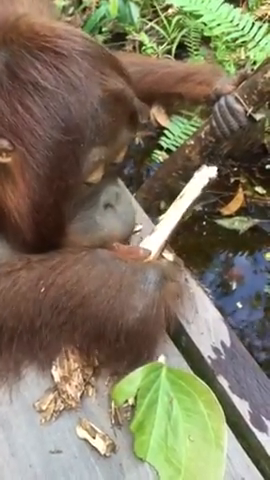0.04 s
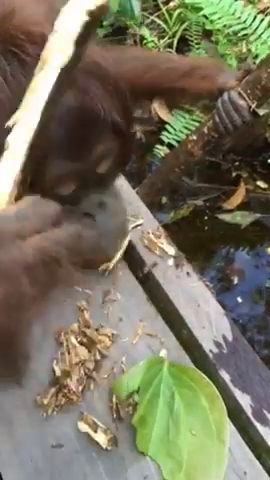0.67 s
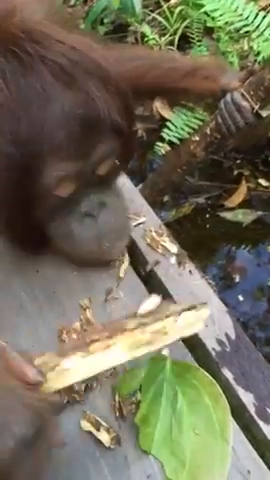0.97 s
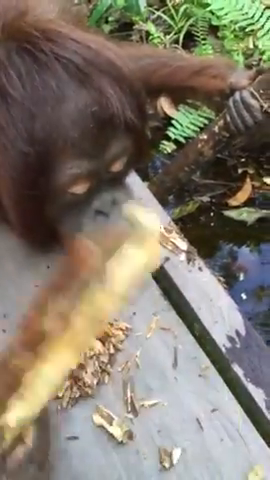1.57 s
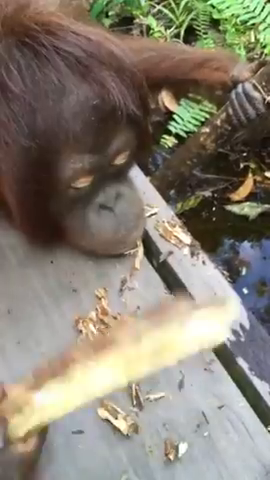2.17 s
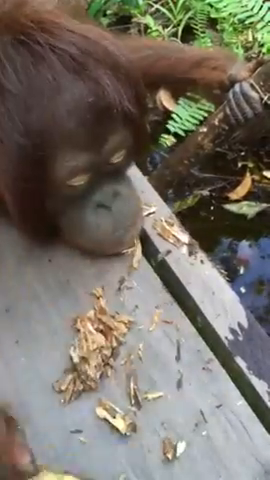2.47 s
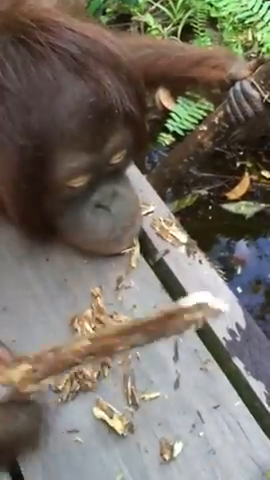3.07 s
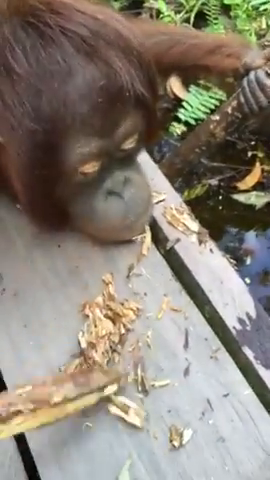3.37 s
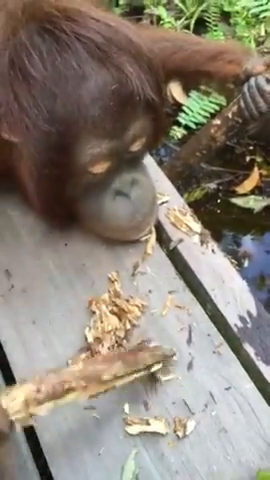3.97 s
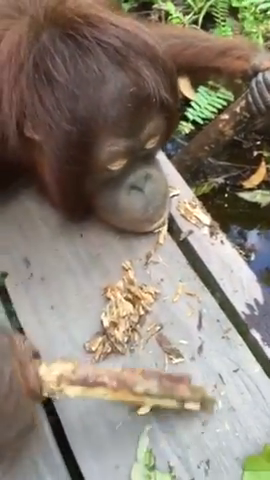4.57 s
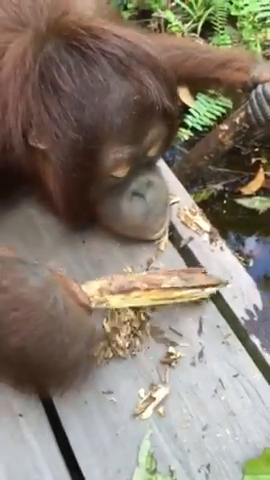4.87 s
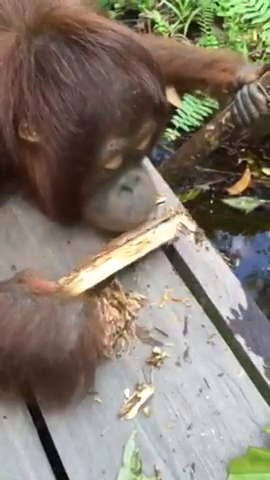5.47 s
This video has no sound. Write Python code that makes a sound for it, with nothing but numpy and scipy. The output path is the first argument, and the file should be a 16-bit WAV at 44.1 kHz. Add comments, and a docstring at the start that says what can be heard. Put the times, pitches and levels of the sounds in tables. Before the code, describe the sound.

Over a steady, high hiss of cicadas in a forest, a dry stick hits wooden planks close by, about twice a second. Some blows are hard and crunchy, others soft and dull, and the boards ring briefly. Small splinters click and skitter in between. The knocking gives way to faint scraping and a few ticks, while a lower insect drones faintly in the distance.

```python
"""Dry, crunchy knocks of wood on wood, close by, over a steady hiss of cicadas.
An orangutan beats a dry stick on a plank deck: the bark crunches, the plank thumps, deck and stick
ring, and splinters skitter away. Between blows and at the end the stick scrapes over the planks.
Behind it a lower-pitched insect drones and the forest rushes faintly."""
import sys
import numpy as np
from scipy import signal
from scipy.fft import rfft, irfft, next_fast_len
from scipy.io import wavfile
from scipy.ndimage import uniform_filter1d, map_coordinates

SR = 44100
rng = np.random.default_rng(int(sys.argv[2]) if len(sys.argv) > 2 else 0)


def dump_mix(stems):
    """Bounce the given channels to the path in sys.argv[1] as a 16-bit WAV at rate SR."""
    frames = np.atleast_2d(stems).T  # one column per channel
    limited = np.clip(frames, -1, 1)  # hard clip at full scale
    pcm = np.round(limited * 32767).astype(np.int16)
    wavfile.write(sys.argv[1], SR, pcm)


N = 252693
T = np.arange(int(.4 * SR)) / SR  # time axis of one event, s

# Stick hits deck: t/s, force/dB, contact cutoff/Hz, place from the plank's end/bending wavelengths,
# deck ring/dB, stick ring/Hz, bark crunch/dB
BLOWS = [(0.9999, -3, 863, 3.1, 1, 440, -29), (1.5107, -16, 301, 0.62, 1.5, 1020, -29),
         (2.0456, -4.5, 1086, 1.23, -1, 1530, -21.5), (2.0761, -11, 455, 1.38, 1.5, 702, -42),
         (2.56, -15.5, 222, 1.54, -0.5, 1010, -38.5), (3.0371, -15.5, 435, 1.76, 1.5, 569, -41),
         (3.4707, -0.5, 618, 2.15, 0, 514, -22.5), (3.9294, 0.5, 1290, 1.46, -4, 1800, -24),
         (3.974, -20.5, 346, 1.3, 5.5, 769, -51.5), (4.512, -5.5, 700, 1.99, -2.5, 1557, -32),
         (4.553, -11.5, 560, 1.72, 1, 637, -46), (4.925, -20.5, 420, 2.18, 6, 523, -59)]
# Spectrum of breaking bark: f/Hz, level/dB
BARK_SPECTRUM = [(300, -15.5), (1200, 2.5), (2000, -4), (2700, -5), (4200, -1), (5300, -4.5), (7000, -0.5),
                 (9500, -7), (12500, -2), (15500, -3.5)]


def amp(db):
    """Decibels to gain."""
    return 10 ** (np.asarray(db) / 20)


def unit(x):
    """Scale to rms 1."""
    return x / np.sqrt(np.mean(x ** 2) + 1e-20)


def along(points, hz):
    """Interpolate (f/Hz, value) points on a log axis."""
    f, v = np.transpose(points)
    return np.interp(np.log(hz + 1), np.log(f), v)


def filtered(x, response):
    """Apply a frequency response."""
    m = next_fast_len(len(x) + 8192)
    return irfft(rfft(x, m) * response(np.fft.rfftfreq(m, 1 / SR)), m)[:len(x)]


def noise(spectrum, size):
    """Noise of rms 1 with a (f/Hz, level/dB) spectrum."""
    return unit(filtered(rng.standard_normal(size), lambda hz: amp(along(spectrum, hz))))


def band(centre_hz, width_hz, size):
    """Resonant noise band of rms 1."""
    white = rng.standard_normal(size)
    return unit(filtered(white, lambda f: 1 / (1 + (2 * (f - centre_hz) / width_hz) ** 2)))


def butter(x, hz, kind, order):
    """Causal low-pass or high-pass."""
    return signal.sosfilt(signal.butter(order, hz, kind, fs=SR, output="sos"), x)


def fading(x, t60s):
    """Decay each frequency by a (f/Hz, t60/s) table."""
    hz, t, z = signal.stft(x, SR, nperseg=256)
    return signal.istft(z * amp(-60 * t / along(t60s, hz)[:, None]), SR, nperseg=256)[1][:len(x)]


def decay(t60_s):
    """Envelope falling 60 dB in t60_s."""
    return np.exp(-np.log(1000) * T / t60_s)


def swell(sigma_s):
    """Gaussian envelope centred in T."""
    return np.exp(-.5 * ((T - T[-1] / 2) / sigma_s) ** 2)


def wobble(rate_hz):
    """Smooth random curve over the whole scene."""
    knots = rng.standard_normal(int(N * rate_hz / SR) + 4)
    return map_coordinates(knots, [np.arange(N) * rate_hz / SR])


def roughness(samples):
    """Moving average of noise over one event, rms 1."""
    return unit(uniform_filter1d(rng.standard_normal(len(T)), size=samples))


def add(track, at_s, x):
    """Mix x in at at_s."""
    start = max(round(at_s * SR), 0)
    part = track[start:start + len(x)]
    part += x[:len(part)]


def blows(push_db=26.5, flex_hz=900, damping=0.41, modes_db=1, boards_db=-20, node_db=4):
    """Each blow shoves the plank and rings deck and stick; a soft contact leaves out the high modes."""
    # Deck modes: f/Hz, level/dB, t60/s
    deck_modes = [(83.05, -31, 0.22), (112, -40, .28), (161, -37, 0.097), (186.6, -26.5, 0.15),
                  (240.2, -34.5, 0.041), (304.8, -21.5, 0.18), (376, -30.5, 0.038), (435, -32.5, .1),
                  (492, -31, 0.093), (512, -24.5, 0.13), (628, -29, 0.098), (696, -22.5, 0.081),
                  (734, -22, 0.054), (836, -25.5, 0.06), (860, -31, 0.032), (954.5, -26, 0.053),
                  (1085, -31.5, 0.048), (1590, -30, 0.069), (1800, -21.5, 0.044)]
    # Dense ring of the other boards: f/Hz, level/dB
    board_spectrum = [(40, -19.5), (85, -4), (220, 6), (550, 2), (1000, -2.5), (1350, -7), (1900, -4.5),
                      (2400, -11), (5000, -17)]
    # Its decay: f/Hz, t60/s
    board_t60s = [(80, .16), (250, .13), (900, .1), (2000, .085), (6000, .06)]
    free_end_hz = 68  # rebound at the plank's free end
    joist_place, place_hz = 3.45, 307  # places count wavelengths at place_hz
    # only slow bending moves the whole plank
    shove = amp(push_db) * butter(signal.unit_impulse(len(T)), flex_hz, "low", order=1)
    spread = 1 - np.exp(-(T / 0.0013) ** 2)  # the bending wave fills the deck
    notch = signal.iirnotch(1320, Q=2.1, fs=SR)  # the stick passes little force between two modes
    out = np.zeros(N)
    for at_s, force_db, contact_hz, place, ring_db, stick_hz, _ in BLOWS:
        rebound_hz = free_end_hz / np.sqrt(max(1 - place / joist_place, .05))  # stiffer near the joist
        push = filtered(shove, lambda f: f*f / (f*f - rebound_hz ** 2 - 2j * damping * rebound_hz * f))
        modes = np.zeros(len(T))
        for hz, level_db, t60_s in deck_modes:
            shape_db = node_db * np.cos(2 * np.pi * place * np.sqrt(hz / place_hz))  # weak near a node
            gain = amp(level_db + shape_db + .5 * rng.normal())
            modes += gain * np.cos(2 * np.pi * hz * T) * decay(t60_s)
        boards = fading(noise(board_spectrum, len(T)), board_t60s)
        ring = amp(ring_db) * spread * (amp(modes_db) * modes + amp(boards_db) * boards)
        ring = butter(ring, 65, "high", order=3)  # the ring holds little below about 65 Hz
        deck = butter(signal.lfilter(*notch, push) + ring, contact_hz, "low", order=3)
        stick = np.sin(2 * np.pi * stick_hz * T) * decay(0.022) * (1 - np.exp(-T / 0.00095))
        stick *= amp(-12.5 + 0.93 * force_db)  # more prominent in hard blows
        add(out, at_s, amp(force_db) * (deck + stick))
    return out


def bark(sigma_s, cutoff_hz, grain_db=3, clump_db=3):
    """Bark fibres break in clumps of tiny unequal clicks, under one swell."""
    clumps = roughness(samples=60)
    clicks = rng.standard_normal(len(T))
    clicks *= amp(grain_db * rng.standard_normal(len(T)) + clump_db * clumps)
    grains = filtered(clicks, lambda f: amp(along(BARK_SPECTRUM, f)) / np.sqrt(1 + (f / cutoff_hz) ** 4))
    envelope = swell(sigma_s)
    return unit(grains * envelope) * np.sqrt(np.mean(envelope ** 2))


def crunches(lead_s=0.00092):
    """Bark is crushed just ahead of each thump; a softer contact takes longer."""
    out = np.zeros(N)
    for at_s, _, contact_hz, *_, crunch_db in BLOWS:
        crunch = bark(sigma_s=0.7 / contact_hz, cutoff_hz=11700)
        add(out, at_s - lead_s - T[-1] / 2, amp(crunch_db) * crunch)
    return out


def slides(slip_db=5.5, relative_width=0.63):
    """Stick-slip drives one wood resonance while the bark hisses over the plank."""
    # Slides of the stick: centre t/s, sigma/s, resonance/Hz, wood/dB, bark hiss/dB
    strokes = [(1.507, 0.0045, 1960, -33.5, -35.5), (1.522, 0.015, 1880, -73, -47),
               (1.571, 0.013, 1250, -62, -51), (1.634, 0.016, 1100, -52.5, -49.5),
               (2.09, 0.015, 1200, -67, -54), (3.045, 0.026, 1290, -75, -59.5),
               (3.369, 0.013, 1467, -70.5, -60), (3.431, 0.0058, 1360, -35, -54),
               (3.441, 0.0041, 1670, -40.5, -52.5), (4.636, 0.058, 1620, -72, -65),
               (5.143, 0.017, 460, -53, -80), (5.168, .004, 1010, -43, -80),
               (5.34, 0.086, 1190, -71, -73.5), (5.463, 0.018, 670, -55, -85)]
    out = np.zeros(N)
    for centre_s, sigma_s, hz, wood_db, hiss_db in strokes:
        slips = unit(amp(slip_db * roughness(samples=110)))
        rub = slips * band(hz, relative_width * hz, len(T)) * swell(sigma_s)
        rub = butter(rub, .5 * hz, "high", order=2)  # a light touch does not move the plank
        hiss = bark(sigma_s, cutoff_hz=7000)
        add(out, centre_s - T[-1] / 2, amp(wood_db) * rub + amp(hiss_db) * hiss)
    return out


def splinters(snap_db=-16.5, snap_db_per_octave=6, reference_hz=2500, rise_s=0.00032):
    """A splinter gives a dry snap and a faintly pitched ring; small ones ring higher and shorter."""
    # Splinters snapping off and landing: t/s, level/dB, f/Hz
    ticks = [(0.895, -27, 2540), (1.07, -29, 4180), (1.123, -34, 1510), (1.138, -39, 2100),
             (1.152, -37, 1470), (1.204, -37, 984), (1.558, -35.5, 4270), (1.72, -45, 1800),
             (2.604, -49, 1940), (3.327, -51, 5650), (4.34, -41, 6580), (4.756, -47, 1130),
             (5.003, -38, 1060), (5.005, -42, 2860), (5.162, -38, 1150), (5.645, -43.5, 2340)]
    out = np.zeros(N)
    for at_s, level_db, hz in ticks:
        body = amp(-4) * band(hz, 0.72 * hz, len(T)) + amp(-6) * np.sin(2 * np.pi * hz * T)
        ring = body * decay(0.017 * np.sqrt(reference_hz / hz))
        ring = butter(ring, .5 * hz, "high", order=2)  # too small to radiate lows
        snap_gain = amp(snap_db + snap_db_per_octave * np.log2(hz / reference_hz))
        snap = snap_gain * noise(BARK_SPECTRUM, len(T)) * decay(0.036)
        add(out, at_s, amp(level_db) * (ring + snap) * (1 - np.exp(-T / rise_s)))
    return out


def crumbs(level_db=-59, spread_db=8, middle_hz=5000, t60_s=0.054, count=20):
    """Loose bark crumbs tick faintly as the stick is handled."""
    out = np.zeros(N)
    for when, faintness, pitch in rng.random((count, 3)):
        hz = middle_hz * 2 ** (2 * pitch - 1)
        tick = band(hz, hz, len(T)) * decay(t60_s)
        add(out, when * N / SR, amp(level_db - spread_db * faintness) * tick)
    return out


def reflections(x, near_db=-14, near_t60_s=0.088, far_db=-28):
    """The deck and the ape's body scatter the sound at once; foliage returns a faint tail."""
    # Decay of the tail: f/Hz, t60/s
    foliage_t60s = [(200, .16), (800, .3), (2000, .28), (12000, .1)]
    near = rng.standard_normal(len(T)) * decay(near_t60_s) * (1 - np.exp(-T / 0.0024))
    far = fading(rng.standard_normal(len(T)), foliage_t60s)
    response = amp(near_db) * near / np.linalg.norm(near) + amp(far_db) * far / np.linalg.norm(far)
    return signal.fftconvolve(x, response)[:N]


def insects(brightening=1.7):
    """Many cicadas merge into a hiss with an overtone; a lower insect holds a narrow, wavering note."""
    # Cicada band: f/Hz, level/dB
    cicada_spectrum = [(6100, -45.5), (6600, -27), (6950, -11.5), (7150, -5), (7280, 0), (7400, -1.5),
                       (7750, -4.5), (8150, -10), (8550, -24), (8900, -23), (9500, -40.5)]
    # Cicada chorus: t/s, level/dB
    chorus_levels = [(0.0, -53.5), (1.72, -53.5), (2.12, -55), (3.19, -55.5), (3.65, -57), (4.5, -53.5),
                     (5.73, -54)]
    # Lower insect: t/s, level/dB
    drone_levels = [(0.0, -78.5), (3.43, -75.5), (3.62, -80), (5.2, -75.5), (5.73, -71.5)]
    t = np.arange(N) / SR
    chorus_db = np.interp(t, *np.transpose(chorus_levels)) + 0.87 * wobble(29)
    mean_db = chorus_db.mean()
    overtone_db = mean_db - 14 + brightening * (chorus_db - mean_db)  # louder is brighter
    drone_db = np.interp(t, *np.transpose(drone_levels)) + 2 + wobble(13)
    return (amp(chorus_db) * noise(cicada_spectrum, N)
            + amp(overtone_db) * band(14800, 1050, N)
            + amp(drone_db) * band(3240, 140, N))


def forest(level_db=-67):
    """Faint, dull rush of the forest."""
    # Forest rush: f/Hz, level/dB
    rush_spectrum = [(15, -4.5), (35, 6.5), (65, 12.5), (110, -0.5), (300, -0.5), (520, -4.5), (750, -9.5),
                     (950, -11), (1500, -12), (3000, -13), (4900, -17), (6200, -15), (10500, -27.5),
                     (13500, -34.5)]
    return amp(level_db + 0.76 * wobble(6)) * noise(rush_spectrum, N)


def scene():
    """The stick close by, over insects and forest; mono."""
    wood = blows() + crunches() + slides() + splinters() + crumbs()
    return (wood + reflections(wood) + insects() + forest())[None]


def record(dry):
    """Thin the deepest bass and cut off the top treble."""
    low_hz, top_hz = 45, 15500
    thinned = butter(dry, low_hz, "high", order=2)
    return np.array([filtered(x, lambda hz: 1 / (1 + (hz / top_hz) ** 200)) for x in thinned])


dry = scene()
out = record(dry)
dump_mix(out)
```